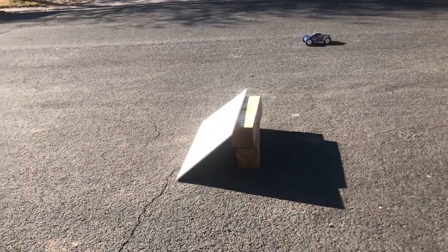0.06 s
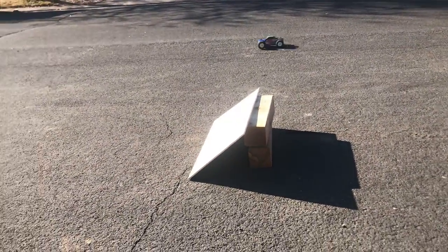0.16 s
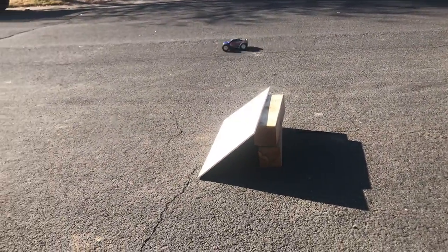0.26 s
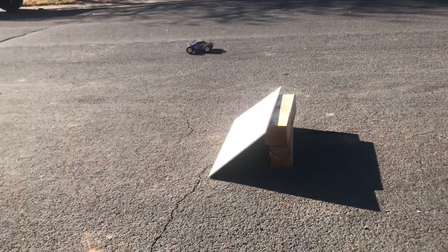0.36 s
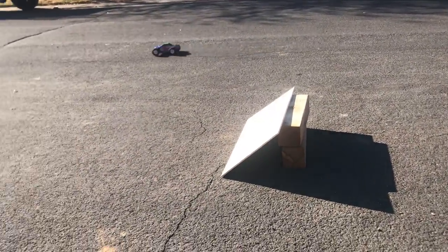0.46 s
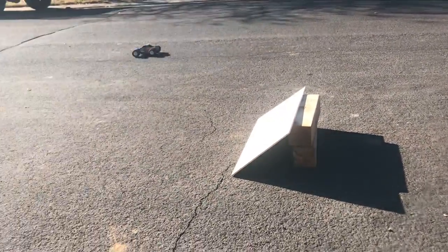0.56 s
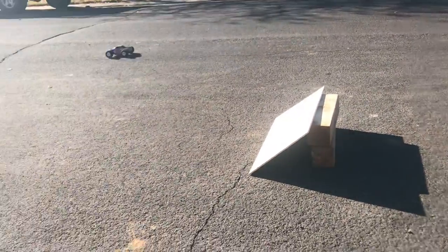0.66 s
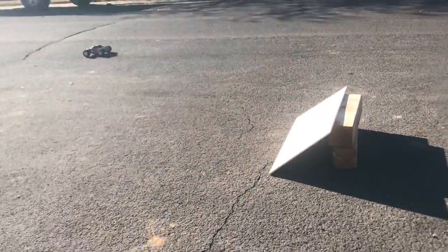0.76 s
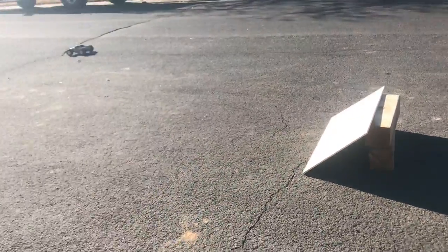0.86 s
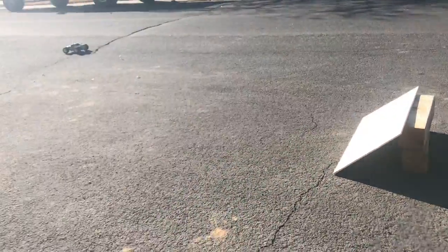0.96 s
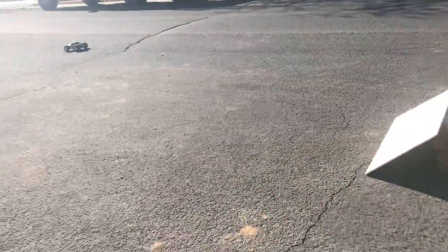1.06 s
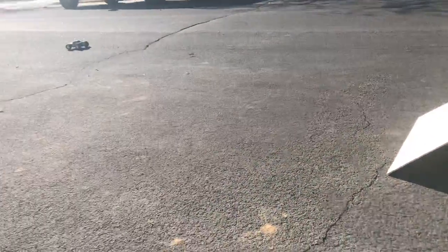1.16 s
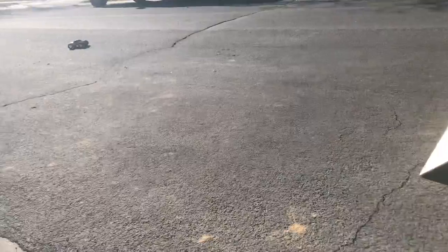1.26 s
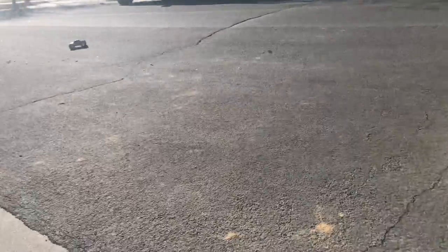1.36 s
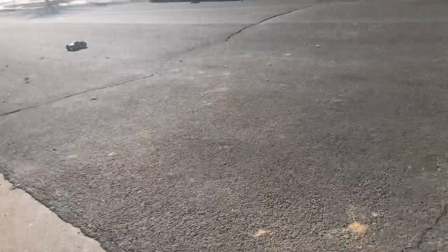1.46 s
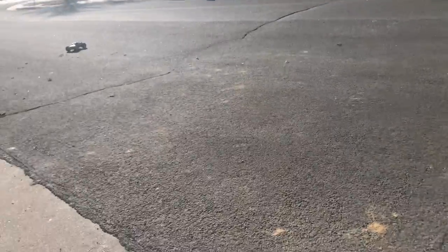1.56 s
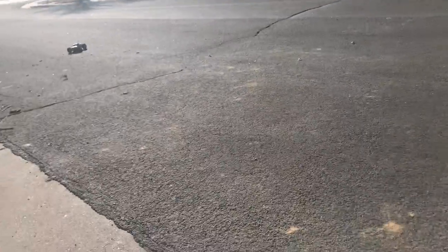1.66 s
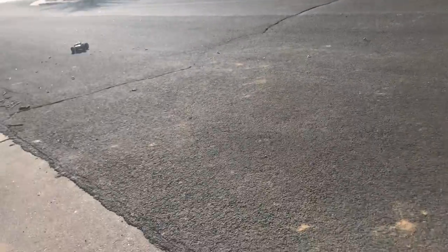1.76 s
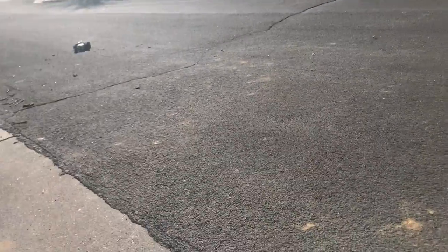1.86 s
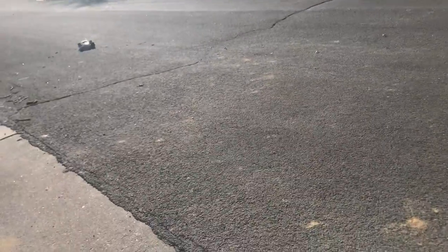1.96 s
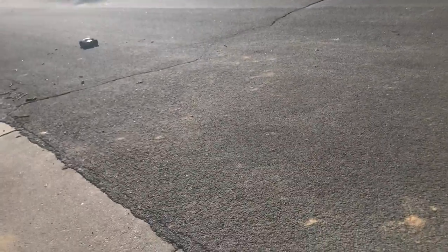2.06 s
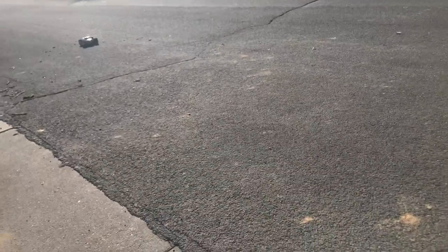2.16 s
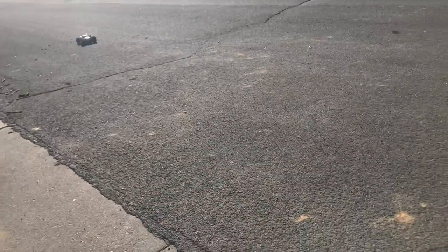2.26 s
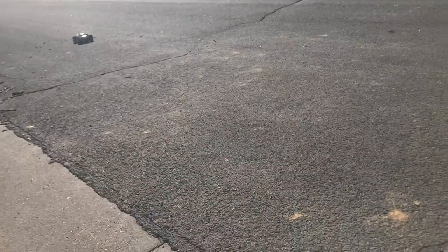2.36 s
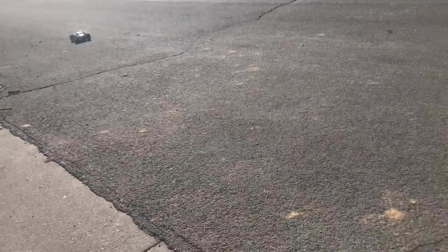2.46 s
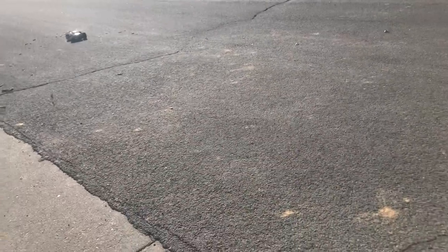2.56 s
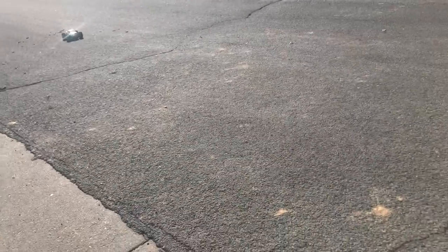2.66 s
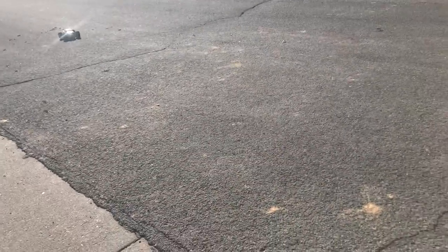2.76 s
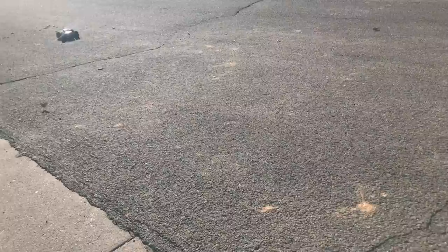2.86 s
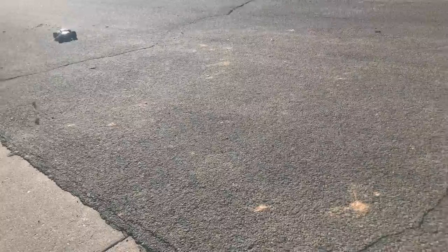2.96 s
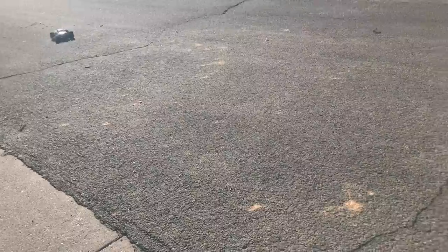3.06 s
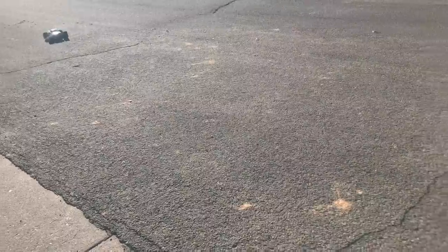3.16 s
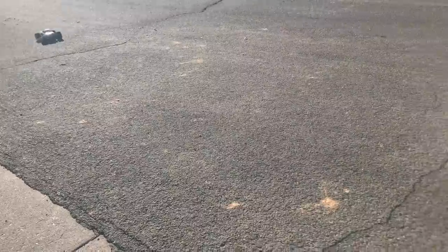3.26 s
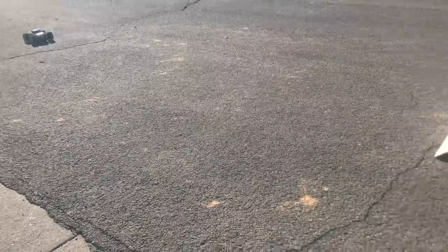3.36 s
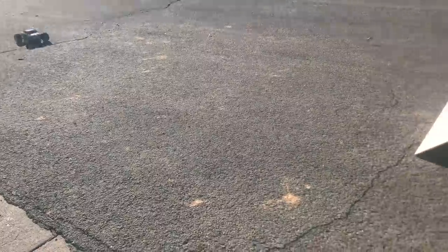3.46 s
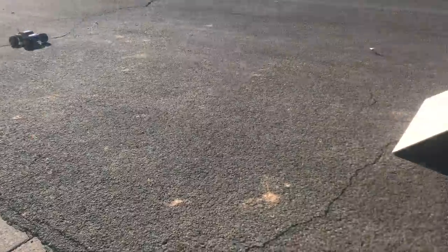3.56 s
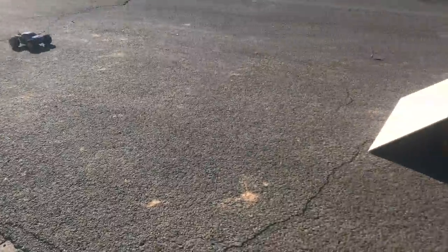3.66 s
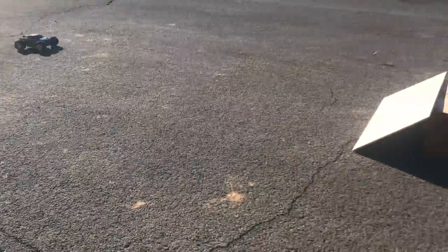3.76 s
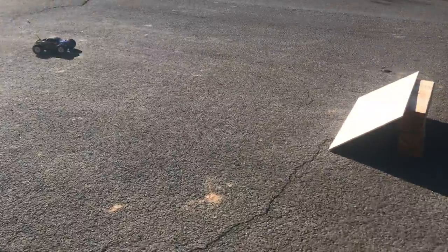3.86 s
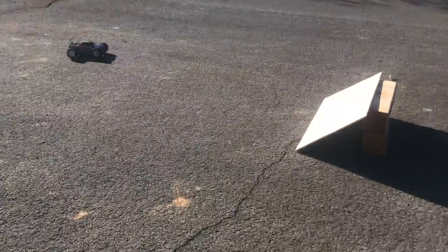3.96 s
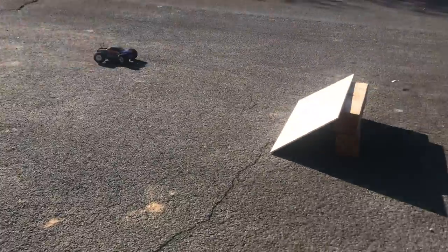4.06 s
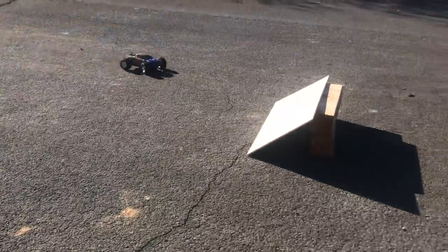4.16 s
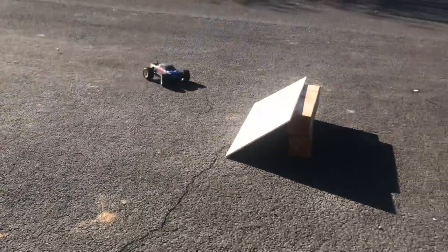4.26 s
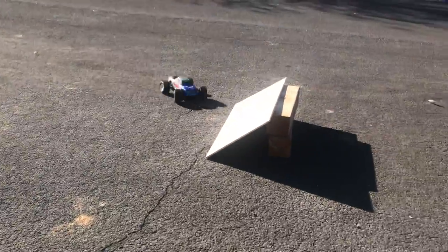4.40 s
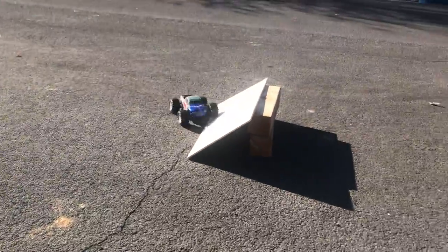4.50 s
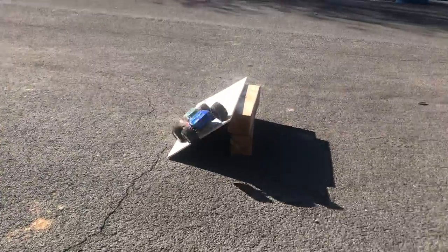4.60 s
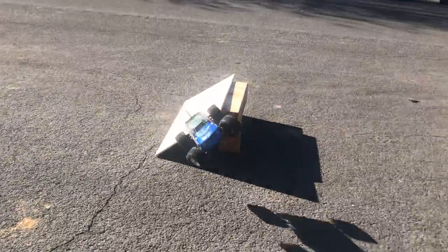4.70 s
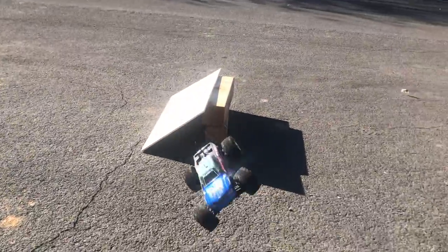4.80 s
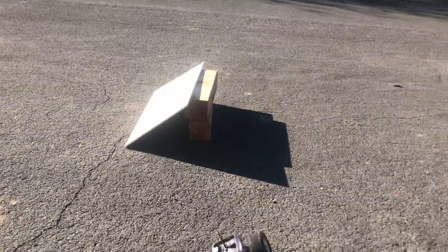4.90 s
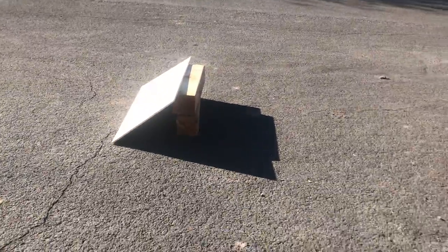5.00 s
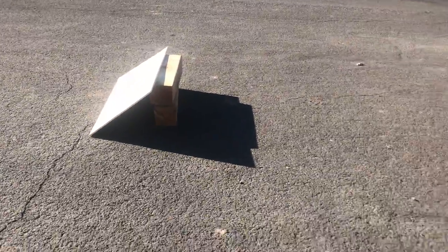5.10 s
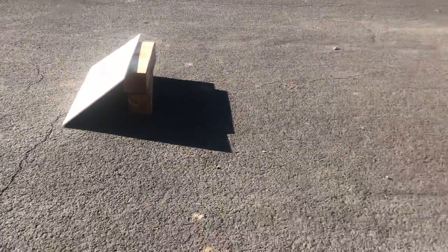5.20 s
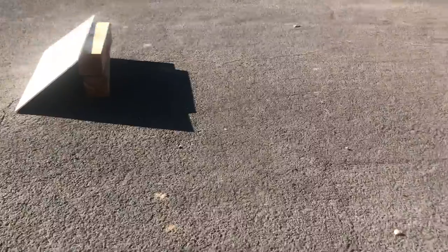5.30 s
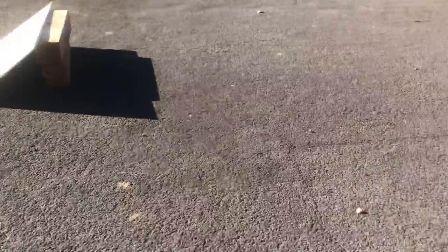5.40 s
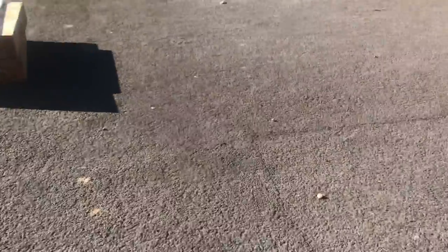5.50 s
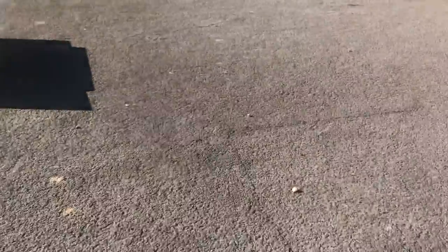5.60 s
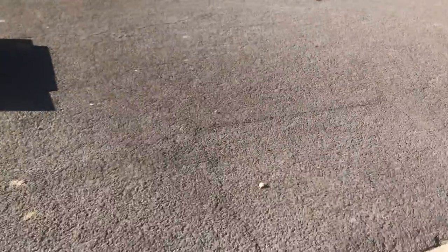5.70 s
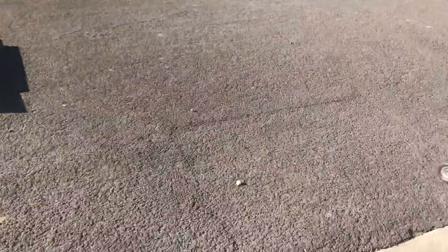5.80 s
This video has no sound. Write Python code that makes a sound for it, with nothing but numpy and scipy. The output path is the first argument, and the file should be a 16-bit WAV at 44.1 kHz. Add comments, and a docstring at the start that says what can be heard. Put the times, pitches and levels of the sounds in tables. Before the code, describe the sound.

A small electric remote-control truck drives over rough asphalt a few metres away, its gears whining and chattering in short, high surges above a faint ring of hollow tyres. From about 1.3 seconds the pitch falls and the sound grows quieter as it slows and turns, with a tiny steering whir and a few faint ticks of grit. At about 2.6 seconds it accelerates again in several pulls, the whine rising and coming closer. Wind rumbles on the microphone, strongest from 4 seconds to just past 5. At 4.5 seconds the truck hits a plywood ramp with a sharp plastic knock, its gears spin up briefly in the air, and it lands near 5 seconds with a second knock, a light clatter and a tyre scrub. The pitch drops, the steering whirs, and a last burst of whine comes at 5.7 seconds. The street is otherwise a soft hush.

```python
"""A small electric remote-control truck drives off over rough asphalt in a quiet street. Its meshing
gears whine and chatter in the plastic chassis, surging in short bursts, and its hollow tyres ring.
Near 2 s it slows and turns: the steering servo whirs and grit ticks. It speeds back while wind
buffets the microphone, hits a plywood ramp at 4.5 s, lands near 5 s, steers and pulls away."""
import sys
import numpy as np
from scipy import signal
from scipy.fft import rfft, irfft
from scipy.io import wavfile
from scipy.ndimage import uniform_filter1d

SR = 44100
rng = np.random.default_rng(int(sys.argv[2]) if len(sys.argv) > 2 else 0)


def dump_mix(stems):
    """Bounce the given channels to the path in sys.argv[1] as a 16-bit WAV at rate SR."""
    frames = np.atleast_2d(stems).T  # one column per channel
    limited = np.clip(frames, -1, 1)  # hard clip at full scale
    pcm = np.round(limited * 32767).astype(np.int16)
    wavfile.write(sys.argv[1], SR, pcm)


N = 257544
TIME = np.arange(N) / SR

# Speed of the gears. Each row: time in seconds, tooth rate in Hz.
TOOTH_RATE = [(0, 2706), (.29, 2910), (.36, 3030), (.55, 3153), (1, 2860), (1.32, 2792), (1.5, 1747),
              (2, 545.6), (2.55, 479), (2.735, 1048), (2.85, 1229), (3.11, 1156), (3.25, 1517), (3.6, 2175),
              (3.9, 2388), (4.05, 2645), (4.35, 2645), (4.68, 2293), (4.87, 3268), (4.95, 3158),
              (5.07, 1793), (5.65, 1141), (5.72, 1375), (5.84, 1473)]
# Path of the truck. Each row: time in seconds, distance in metres.
DISTANCE = [(0, 3.9), (.5, 3.42), (1.2, 4.54), (2.2, 6.24), (3, 7.36), (3.8, 3.58), (4.5, 2.54), (5, 2.62),
            (5.84, 2.54)]
# Shading of the gears by the body. Each row: time in seconds, treble gain in dB.
TREBLE_GAIN = [(0, -1), (1.3, 0), (2.3, -4.5), (3.3, -6), (3.78, -13.5), (4.2, -1), (4.85, 7), (5.2, -1),
               (5.84, -2.5)]
# Pulls on the throttle. Each row: start and end in seconds, level at 1 m in dB, whine over chatter in dB.
THROTTLE_PULLS = [(0, 0.303, -20.5, 0.5), (0.326, 0.741, -21.5, -17.5), (2.598, 2.668, -26.5, -3.5),
                  (2.671, 2.879, -19, 3), (2.967, 2.982, -17, -3), (3.071, 3.193, -19, -3.5),
                  (3.188, 3.328, -14.5, 5), (3.338, 3.648, -17.5, -1), (3.666, 3.862, -16, 3),
                  (3.879, 4.07, -17, -0.5), (4.092, 4.59, -22.5, -3.5), (4.732, 4.99, -30.5, -10),
                  (5.144, 5.19, -26.5, -15), (5.676, 5.84, -14, 9)]
# Short, sharp bursts of gear whine and chatter, each with a falling chirp, in evenly spaced runs.
# Each row: first and last start in seconds, count, first and last level at 1 m in dB,
# burst length in seconds, whine over chatter in dB, speed swing as a share.
GEAR_BURSTS = [(.037, .216, 6, -14.5, -17, .008, 2.5, 0.013),
               (0.34, 0.524, 3, -23, -19, 0.011, -14, 0.0082),
               (0.671, 0.854, 5, -23.5, -16, 0.012, -16.5, 0.013),
               (0.894, 1.046, 4, -19, -20, 0.015, -16, .015),
               (1.141, 1.301, 3, -19.5, -20, 0.0095, -5, 0.035),
               (1.356, 1.485, 3, -22, -19, 0.0098, -7, .05), (1.781, 1.861, 2, -35, -33, 0.022, -8, 0.026),
               (1.97, 2.106, 3, -25.5, -30, 0.033, -1.5, 0.034),
               (2.197, 2.268, 2, -30.5, -31.5, 0.025, -5.5, 0.034),
               (2.382, 2.517, 2, -29.5, -30, 0.019, -3, 0.034),
               (4.081, 4.319, 7, -19, -18.5, .015, 2.5, 0.045), (4.379, 4.545, 5, -22, -21, .018, -1, .04),
               (4.604, 4.665, 2, -20.5, -23, 0.034, -2.5, 0.081),
               (4.735, 4.86, 3, -18.5, -16, .014, -2.5, 0.028), (4.93, 4.987, 2, -14, -12, .023, -4.5, .12),
               (5.059, 5.104, 2, -21.5, -22, 0.012, -11.5, .03),
               (5.249, 5.328, 3, -23.5, -21.5, .017, -6.5, 0.028),
               (5.41, 5.493, 2, -23, -35, 0.029, -6.5, 0.031),
               (5.555, 5.62, 2, -16.5, -23.5, 0.014, -1.5, 0.027),
               (5.731, 5.834, 3, -21.5, -27, 0.02, 15, 0.046)]
# The tyres scrub as they brake, climb the ramp, land and spin. Each row: middle in seconds,
# ring level and tread level at 1 m in dB, length in seconds.
TYRE_SCRUBS = [(0.502, -27, -41.5, 1), (1.41, -29, -35, 0.3), (1.601, -24, -41, 0.054),
               (4.601, -44, -30, .1), (4.991, -17.5, -25, 0.062), (5.116, -26, -31, 0.18),
               (5.286, -30.5, -37.5, 0.12), (5.787, -29, -60, 0.2)]
# Blows on the chassis. Each row: time in seconds, relative levels of ring and of crack in dB.
CHASSIS_BLOWS = [(4.5003, -10.5, -0.5), (4.5041, -30, -7), (4.549, -18, -17), (4.622, -17.5, -27),
                 (4.946, -20.5, -12), (4.987, -23, -25), (5.066, -29.5, -36.5), (5.116, -18.5, -35)]
# Modes of the chassis. Each row: frequency in Hz, relative level in dB, 60 dB decay time in seconds.
CHASSIS_MODES = [(342.2, -12, 0.066), (585, -4.5, 0.063), (996, -4, 0.15), (1166, -3, 0.054),
                 (1412, -2.5, 0.099), (1798, -0.5, 0.064), (2220, 9.5, 0.0082), (2650, -4, 0.052),
                 (2770, -5, 0.18), (3130, -22, .035), (3370, -24, 0.032), (4060, -11.5, 0.28)]
# Ticks of grit. Each row: time in seconds, relative level in dB.
GRIT_TICKS = [(1.867, -32), (2.154, -30), (2.158, -24.5), (2.162, -30), (2.187, -39), (2.3835, -29),
              (2.389, -24), (2.6084, -14), (2.62, -38), (2.6255, -33), (2.631, -24), (2.633, -29)]
# Steering moves. Each row: middle and length in seconds, start and end pitch in Hz, level in dB.
SERVO_MOVES = [(1.772, 0.062, 6850, 8980, -46.5), (5.41, 0.028, 5000, 6500, -31),
               (5.445, .025, 5314, 6300, -32)]
# Breeze on the microphone. Each row: time in seconds, relative level in dB.
BREEZE_LEVEL = [(0, -52), (2.4, -49.5), (3.75, -43.5), (4.05, -27), (4.5, -35.5), (5.25, -30.5),
                (5.45, -43), (5.84, -47)]
# Gusts. Each row: middle in seconds, level in dB, length in seconds.
WIND_GUSTS = [(1.78, -41, 0.098), (2.72, -42.5, .05), (2.895, -29, 0.02), (2.95, -33.5, 0.083),
              (3.28, -35.5, 0.065), (4.158, -19.5, 0.043), (4.39, -26, 0.035), (4.635, -26.5, 0.19),
              (4.99, -28.5, 0.096), (5.23, -25, 0.039)]
# Spectra of the sources. Each row: frequency in Hz, relative level in dB.
WHINE_SPECTRUM = [(400, -27), (900, -4.5), (1200, -4), (1450, 10.5), (1850, -6), (2300, -2), (2800, -5.5),
                  (3400, 12.5), (4200, 0), (4850, -1.5), (5500, 3), (6800, 1.5), (8500, -13), (11000, -10),
                  (16000, -14.5)]
CHATTER_SPECTRUM = [(500, -47), (1200, -74), (1850, -7), (2400, -1), (3450, 2), (4200, -5.5), (4850, -8),
                    (5600, 2.5), (6700, -3.5), (7700, -15), (9000, -2.5), (10500, -17.5), (12500, -11.5),
                    (16000, -40.5)]
TYRE_SPECTRUM = [(700, -34), (1100, -14.5), (1300, -3.5), (1430, 1), (1580, -4.5), (1780, -12), (2600, -26)]
TREAD_SPECTRUM = [(150, -3), (420, -8.5), (580, 3.5), (760, -3), (1020, 2.5), (1300, -9), (2500, -31)]
BUFFET_SPECTRUM = [(15, -42), (35, -4.5), (56, 0), (80, 2.5), (120, -6), (200, -14.5), (320, -34.5),
                   (600, -68), (1500, -69)]
STREET_SPECTRUM = [(18, -42), (30, -2), (81, -17), (154, 2), (460, -12.5), (837, -7.5), (1970, -18),
                   (3230, -7.5), (4780, -19), (5730, -17), (15000, -72)]

CRUISE_HZ, TOP_HZ = 3000, 15900  # tooth rate at cruising speed; upper limit of the sound
THROTTLE_ATTACK_S, THROTTLE_RELEASE_S = .008, .014


def drivetrain(tremble_hz=33.98, tremble_share=.008, grip_db=1.84, axle_ratio=.41):
    """Changing load modulates the gears in pitch and level; pressure falls inversely with distance."""
    (hz,), (metres,), (treble_db,) = curves(TOOTH_RATE), curves(DISTANCE), curves(TREBLE_GAIN)
    octaves = np.log2(hz / CRUISE_HZ)
    drive_power, drive_whine_db = throttle(octaves)
    burst_power, burst_whine_db, swing = gear_bursts()
    power = drive_power + burst_power
    whine_db = (drive_power * drive_whine_db + burst_power * burst_whine_db) / power
    # the wheels tremble on the rough asphalt, gripping and slipping, more so around the bursts
    unrest = 1 + 4 * uniform_filter1d(burst_power / power, size=10000)
    tremble_phase = 2 * np.pi * np.cumsum(tremble_hz * (1 + .25 * walk(20))) / SR
    hz = hz * (1 + swing + tremble_share * unrest * (np.cos(tremble_phase) + .5 * walk(120)))
    bite_db = grip_db * unrest * np.sin(tremble_phase)
    whine = amp(whine_db + bite_db)
    slack = np.clip(1 - amp(whine_db), 0, 1)
    overrun = amp(-4 + 14 * octaves) * slack  # the axle gear sings when fast and unloaded
    # the overtones fall faster when the body shades the treble
    motor = gear_whine(hz, range(1, 13), slope_db=.1 + .14 * treble_db, flutter_db=3.8, rough=.31)
    axle = gear_whine(hz * axle_ratio, [3], slope_db=0, flutter_db=3, rough=.4)
    blend = gear_chatter(hz, slack) + whine * motor + overrun * axle
    blend = blend / np.sqrt(1 + whine ** 2 + overrun ** 2)
    treble = signal.sosfilt(signal.butter(1, 7000, "high", fs=SR, output="sos"), blend)
    shaded = blend + (amp(treble_db) - 1) * treble
    shake = amp(1.5 * walk(130) + bite_db / 2)
    return shaded * np.sqrt(power) * shake / metres


def gear_whine(hz, orders, slope_db, flutter_db, rough):
    """Periodic tooth contact makes harmonics that flutter as they sweep through chassis resonances."""
    phase_jitter = rough * (hz / 2500) * (walk(260) + .82 * walk(800))
    phase = 2 * np.pi * np.cumsum(hz) / SR + phase_jitter
    tone = 0
    for k in orders:
        resonance = response(k * hz, WHINE_SPECTRUM) * (k * hz < TOP_HZ)
        gain = resonance * amp(slope_db * np.log2(k) + flutter_db * walk(70))
        tone = tone + gain * np.sin(k * phase + 2 * np.pi * rng.random())
    return tone / np.sqrt(uniform_filter1d(tone ** 2, size=4000) + 1e-9)


def gear_chatter(hz, slack, pinion_teeth=13, spur_teeth=47, wear=1.2, backlash=.046, scatter_db=1.7):
    """Backlash: worn teeth collide in a pattern that repeats with each turn, and rasp as they slide."""
    teeth_passed = np.cumsum(hz) / SR
    tooth = np.arange(1, int(teeth_passed[-1]) - 1)
    pinion, spur = rng.standard_normal((pinion_teeth, 2)), rng.standard_normal((spur_teeth, 2))
    chance = rng.standard_normal((N, 2))[tooth]
    lag, force = (wear * (pinion[tooth % pinion_teeth] + spur[tooth % spur_teeth]) + chance).T
    lag = lag * (1 + 1.3 * np.interp(tooth, teeth_passed, slack))  # unloaded teeth have more play
    contact_s = np.interp(tooth + backlash * lag, teeth_passed, TIME)
    clicks = strikes(contact_s, scatter_db * force) / np.sqrt(hz)
    shell_ring = convolve(clicks, fade(.012) * rng.standard_normal(SR // 2))
    rasp = .45 * colour(noise(), CHATTER_SPECTRUM)
    return panel_rattle(colour(shell_ring, CHATTER_SPECTRUM) + rasp)


def panel_rattle(x, depth_db=3.7):
    """Loose panels modulate the sound: patches of its spectrum swell and fade independently."""
    _, _, bands = signal.stft(x, nperseg=512, noverlap=384)
    patches = uniform_filter1d(rng.standard_normal(bands.shape), size=3, axis=0)
    patches = unit(uniform_filter1d(patches, size=9, axis=1))
    _, rattled = signal.istft(bands * amp(depth_db * np.clip(patches, -2, 2)), nperseg=512, noverlap=384)
    return unit(rattled[:N])


def throttle(octaves, coast_db=-34.5, coast_whine_db=-23, sag_db_per_s=3):
    """Loaded teeth are louder and more tonal than coasting ones. Returns power and whine in dB."""
    power = amp(coast_db + 3 * octaves) ** 2
    whine = power * (coast_whine_db + octaves)
    for start, end, db, whine_db in THROTTLE_PULLS:
        sag_db = sag_db_per_s * np.clip(TIME - start, 0, end - start)
        pull = (held(start, end, THROTTLE_ATTACK_S, THROTTLE_RELEASE_S) * amp(db - sag_db)) ** 2
        power, whine = power + pull, whine + pull * whine_db
    return power, whine / power


def gear_bursts(after_db=-8, after_s=.012):
    """Brief modulation: the gears surge and chirp down. Returns power, whine in dB and speed swing."""
    power, whine, swing = 0, 0, 0
    for first, last, count, first_db, last_db, length, whine_db, share in GEAR_BURSTS:
        for start, db in np.linspace((first, first_db), (last, last_db), round(count)):
            after_pulse = amp(after_db) * swell(start + length + after_s, after_s)
            shape = held(start, start + length, attack_s=.0027, release_s=.003) + after_pulse
            burst = (amp(db + rng.standard_normal()) * shape) ** 2
            power, whine = power + burst, whine + burst * whine_db
            offset = np.clip((TIME - start) / length - .5, -4, 4)
            swing = swing - 2 * share * offset * np.exp(.5 - 2 * offset ** 2)  # a falling chirp
    return power, whine / power, swing


def tyres(ring_db=-27, tread_db=-38.5, undriven_db=-6, free_ring_db=-23.5):
    """Forced vibration: asphalt drums the tread and rings the hollow tyres, more at speed or in scrubs."""
    (hz,), (metres,) = curves(TOOTH_RATE), curves(DISTANCE)
    octaves = np.log2(hz / CRUISE_HZ)
    airborne = swell(4.82, .19)  # off the ramp the tread falls silent and the tyres ring freely
    pulls = [held(start, end, THROTTLE_ATTACK_S, THROTTLE_RELEASE_S) for start, end, *_ in THROTTLE_PULLS]
    undriven = 1 - np.max(pulls, axis=0)
    ring_power = amp(ring_db + 5.5 * octaves + undriven_db * undriven) ** 2
    ring_power += airborne * amp(free_ring_db) ** 2
    tread_power = (amp(tread_db + 4 * octaves) * (1 - airborne)) ** 2
    for middle, scrub_ring_db, scrub_tread_db, length in TYRE_SCRUBS:
        scrub = swell(middle, length)
        ring_power += scrub * amp(scrub_ring_db) ** 2
        tread_power += scrub * amp(scrub_tread_db) ** 2
    bumps = amp(1.85 * walk(60))
    ringing = colour(noise() * bumps, TYRE_SPECTRUM) * np.sqrt(ring_power)
    roar = colour(noise() * bumps, TREAD_SPECTRUM) * np.sqrt(tread_power)
    return (ringing + roar) / metres


def chassis_knocks(crack_hz=3200, crack_s=.00048):
    """Impacts on the ramp and on landing radiate a hard crack and excite the chassis's damped modes."""
    times, ring_db, crack_db = np.transpose(CHASSIS_BLOWS)
    body = sum((-1) ** k * amp(db) * ring(hz, t60) for k, (hz, db, t60) in enumerate(CHASSIS_MODES))
    t = TIME[:SR // 100]
    crack = np.exp(-(t / crack_s - 1.5) ** 2) * np.sin(2 * np.pi * crack_hz * t)
    return amp(-8) * convolve(strikes(times, ring_db), body) + convolve(strikes(times, crack_db), crack)


def grit():
    """Small struck stones tick: their modes are high and heavily damped."""
    stone = ring(8600, .00053) - .5 * ring(4580, .0011) + .33 * ring(10600, .0011)
    return amp(5.5) * convolve(strikes(*np.transpose(GRIT_TICKS)), stone)


def servo():
    """Pitch follows rotation rate: the tiny steering motor whirs upwards at each move."""
    flutter, wobble = amp(2 * walk(150)), 1 + .017 * walk(920)
    whir = 0
    for middle, length, start_hz, end_hz, db in SERVO_MOVES:
        hz = np.interp(TIME, [middle - length / 2, middle + length / 2], [start_hz, end_hz])
        whir = whir + amp(db) * swell(middle, length) * np.sin(2 * np.pi * np.cumsum(hz * wobble) / SR)
    return whir * flutter


def wind():
    """Turbulent pressure rumbles on the microphone; the strongest gusts also flutter higher up."""
    (breeze_db,) = curves(BREEZE_LEVEL)
    gust_power = sum(amp(db) ** 2 * swell(middle, length) for middle, db, length in WIND_GUSTS)
    strength = np.sqrt(amp(breeze_db - 1.56) ** 2 + gust_power)
    flutter = colour(noise(), [(60, -17), (150, -6.5), (300, -10.5), (480, -21), (1000, -44.5)])
    return strength * (colour(noise(), BUFFET_SPECTRUM) + 4.6 * strength * flutter)


def street_echo(x, level_db=-20, t60=.3, delay_s=.012):
    """Reflections from the house fronts return as a faint, diffuse tail."""
    tail = rng.standard_normal(SR // 2) * fade(t60) * (TIME[:SR // 2] > delay_s)
    return amp(level_db) * convolve(x, tail / np.linalg.norm(tail))


def street_hush(level_db=-52.5):
    """The ambient noise of the street is broadband and drifts slowly in level."""
    return colour(noise(), STREET_SPECTRUM) * amp(level_db + walk(2.35))


def amp(db):
    """Decibels to amplitude ratio."""
    return 10 ** (np.asarray(db) / 20)


def unit(x):
    """Scale to rms 1."""
    return x / np.sqrt(np.mean(x ** 2))


def curves(rows):
    """Each column of a table, interpolated linearly in time."""
    times, *columns = np.transpose(rows)
    return [np.interp(TIME, times, column) for column in columns]


def response(hz, spectrum):
    """Gain of a spectrum at the given frequencies."""
    points_hz, db = np.transpose(spectrum)
    return amp(np.interp(np.log(hz + 1), np.log(points_hz), db))


def colour(x, spectrum):
    """Filter by a spectrum and scale to rms 1."""
    return unit(irfft(rfft(x) * response(np.arange(N // 2 + 1) * SR / N, spectrum), N))


def noise():
    """White noise."""
    return rng.standard_normal(N)


def walk(rate_hz):
    """Smooth random wander of rms 1."""
    step = max(2, int(SR / rate_hz))
    return unit(uniform_filter1d(np.repeat(rng.standard_normal(N // step + 1), step), step)[:N])


def swell(middle, length):
    """A steep-sided bump of height 1."""
    return np.exp(-np.square(np.minimum((2 * (TIME - middle) / length) ** 2, 10)))


def held(start, end, attack_s, release_s):
    """A plateau of height 1 with exponential edges."""
    before, after = np.maximum(start - TIME, 0), np.maximum(TIME - end, 0)
    return np.exp(-np.minimum(before / attack_s + after / release_s, 20))


def fade(t60):
    """Half a second of exponential decay, falling 60 dB in t60 seconds."""
    return np.exp(-np.log(1000) * TIME[:SR // 2] / t60)


def ring(hz, t60):
    """A struck mode is a damped sinusoid."""
    return fade(t60) * np.sin(2 * np.pi * hz * TIME[:SR // 2])


def strikes(times, db):
    """Single impulses at the given times."""
    return np.bincount((np.asarray(times) * SR).astype(int), amp(db), N)[:N]


def convolve(x, impulse_response):
    """Pass a sound through a linear system."""
    return signal.fftconvolve(x, impulse_response)[:N]


def scene():
    """Superposition: the truck, its echo, the street's hush and the wind add in one channel."""
    truck = drivetrain() + tyres() + servo() + chassis_knocks() + grit()
    return (truck + street_echo(truck) + street_hush() + wind())[None]


def record(dry):
    """Peaks clip at full scale, and a steep low-pass filter limits the bandwidth."""
    low_pass = signal.ellip(10, .2, 80, TOP_HZ, fs=SR, output="sos")
    return signal.sosfilt(low_pass, np.clip(dry, -1, 1))


dry = scene()
out = record(dry)
dump_mix(out)
```